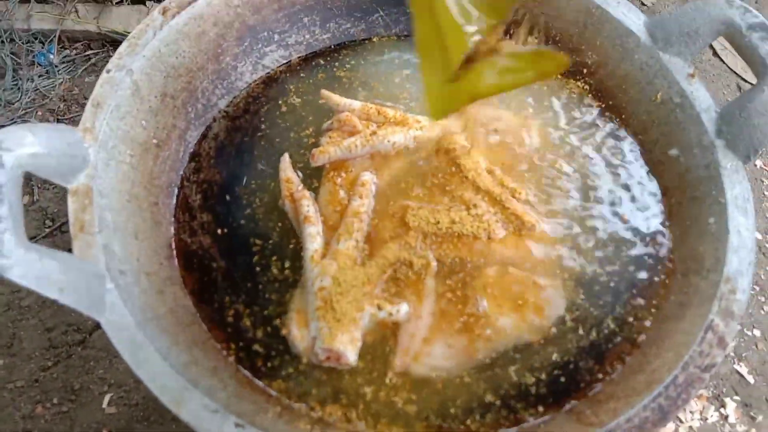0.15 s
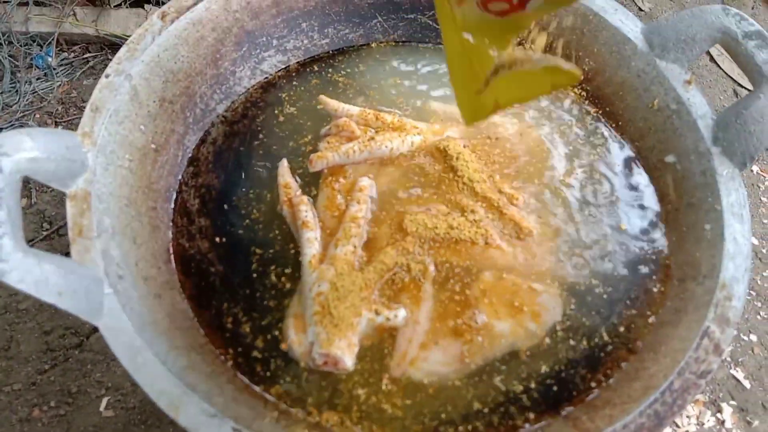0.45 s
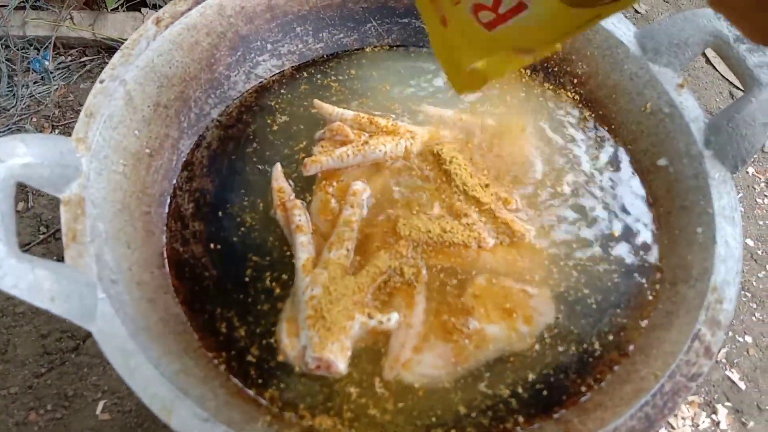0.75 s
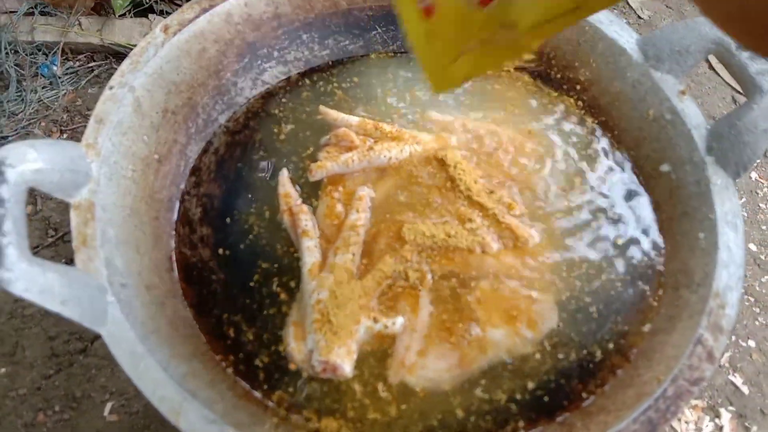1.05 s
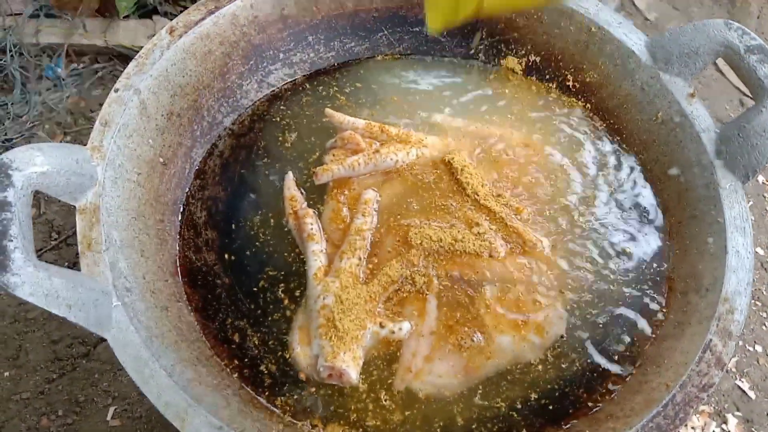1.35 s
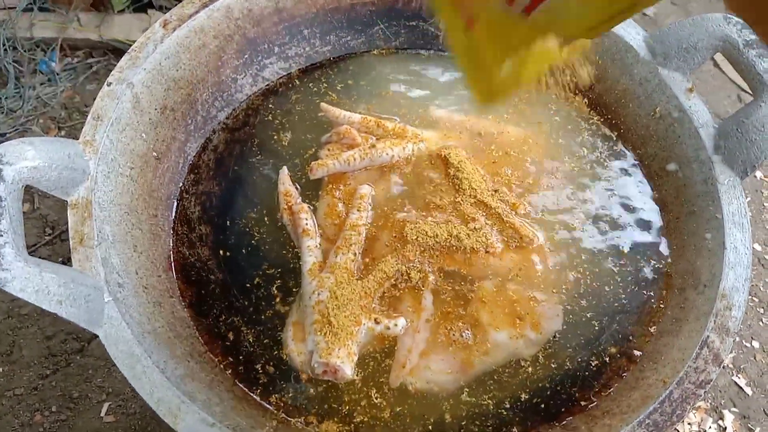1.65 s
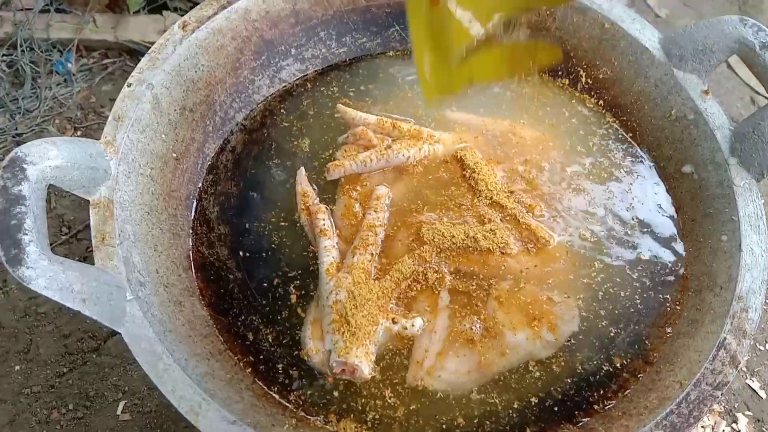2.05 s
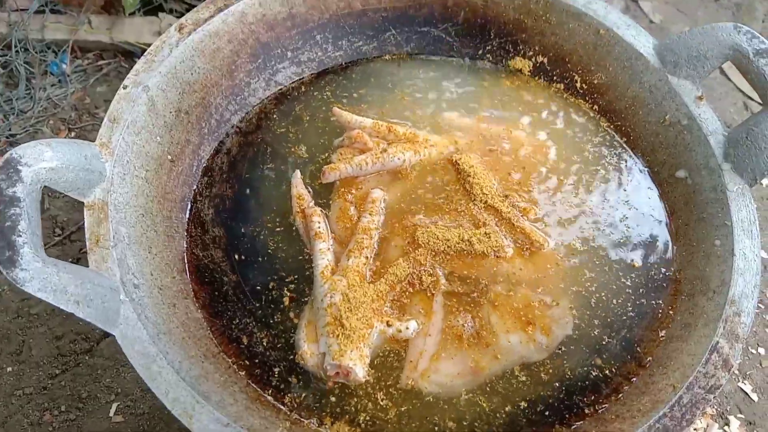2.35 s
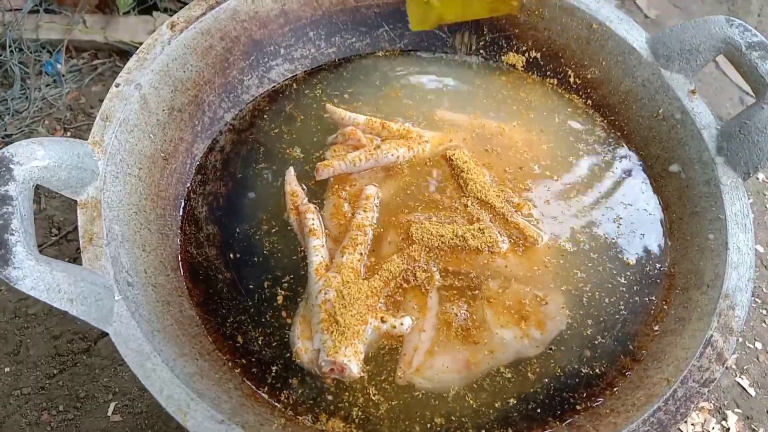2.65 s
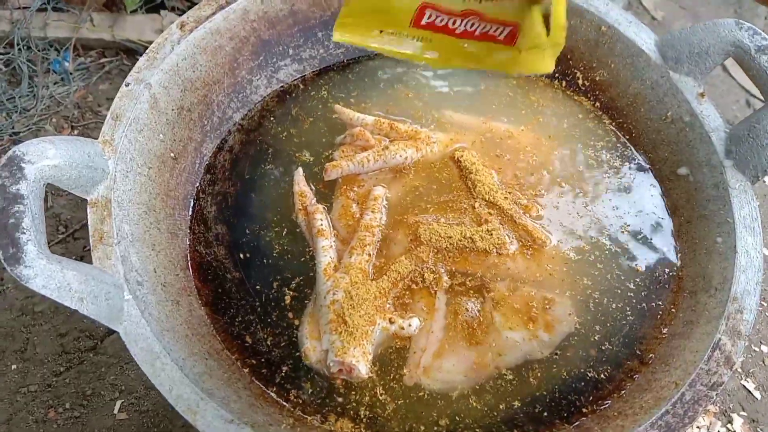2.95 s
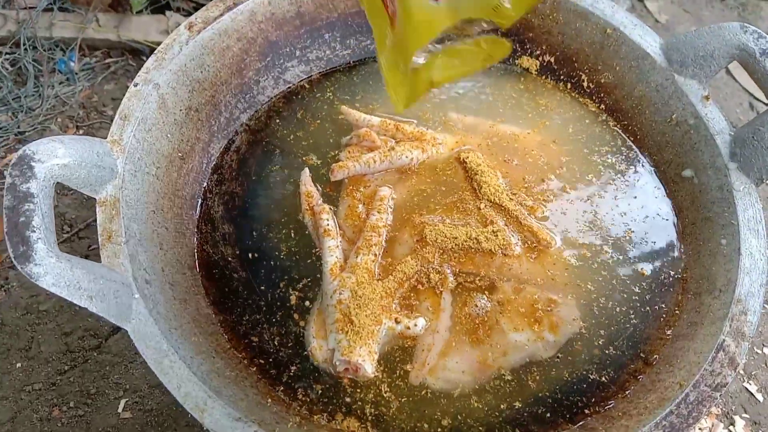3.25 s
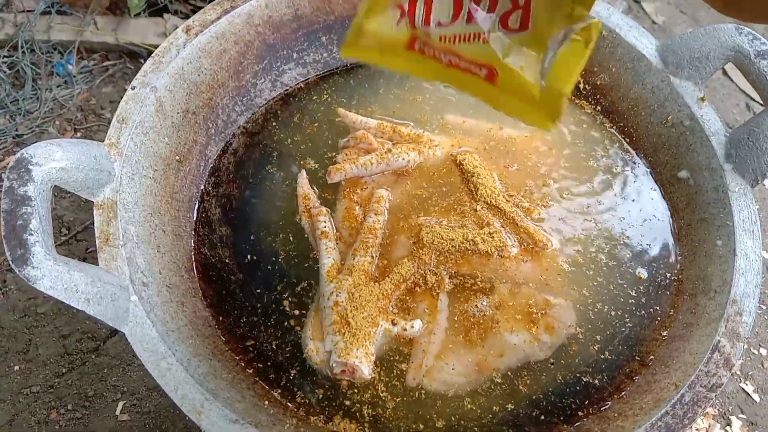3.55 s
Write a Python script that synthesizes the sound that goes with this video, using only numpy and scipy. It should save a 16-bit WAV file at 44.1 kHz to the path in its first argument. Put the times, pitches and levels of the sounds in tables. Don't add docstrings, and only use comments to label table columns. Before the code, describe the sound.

A thin plastic sachet crinkles and snaps sharply, very close, over a pan outdoors.

```python
import sys
import numpy as np
from scipy import signal
from scipy.io import wavfile
from scipy.ndimage import uniform_filter1d, minimum_filter1d

SR = 44100
rng = np.random.default_rng(int(sys.argv[2]) if len(sys.argv) > 2 else 0)


def amplitude_ratio(level_db):
    exponent = np.asarray(level_db, float) / 20
    return 10 ** exponent


def store_wav(level_fs):
    pcm = np.round(np.clip(np.atleast_2d(level_fs), -1, 1) * 32767)
    wavfile.write(sys.argv[1], SR, pcm.T.astype(np.int16))


N = 163170

# pitch_hz, density_db
AIR_COLOUR = [(30, -21), (150, -6.5), (420, -22), (800, -10), (1250, -9), (1800, -10), (4000, -21),
              (5500, -5), (15500, -20)]
# pitch_hz, density_db
FILM_COLOUR = [(210, -44), (350, -53.5), (749, -8), (3960, 0.5), (5710, 4.5), (9330, -24.5), (15500, -5)]
# pitch_hz, width_hz, lift_db
POUCH_RESONANCES = [(3010, 1600, 5.5), (3812, 504, -19.5), (2600, 240, -5), (15500, 710, 4)]
# start_s, level_db, body_db, treble_db
SNAPS = [(0.0528, 0.0, -6, 5), (0.1075, 0.5, 5.5, 8), (0.2458, 1, -9, 5), (0.2753, 8.5, -1, 2.5),
         (0.3122, 0, 1, 9), (0.3205, -1.0, -12, 4), (0.4214, 0.5, -7.5, 0), (0.446, 1.5, 3, 0),
         (0.491, 0, -5, 2.5), (0.5115, 2, -6.5, 0), (0.743, 1.0, -5.5, -6), (0.8335, -2, 1, 5.0),
         (0.979, -1.5, 5.5, 5), (0.9916, 2.5, -0.5, -2), (1.0, -2.5, -4, -2.0), (1.0111, -0.5, 1, 0.0),
         (1.0154, -2, -9.0, -1), (1.0463, 5.5, 1.5, 3), (1.0691, 0.5, -7, -3), (1.2182, 2.5, 0, -2),
         (1.4047, 1.0, -0.5, 9), (1.4982, 4.5, 3.5, 2), (1.5797, -3, 3, -1.0), (1.6041, 0.5, -2, 1.0),
         (1.6104, -6, 5, -4.0), (1.6144, 7, -6.5, -2.0), (1.7036, 6.5, -0.5, 5.5), (1.7396, 2, -8, 0),
         (1.777, -5.5, 0, -4), (1.795, 2, -7, 3), (1.9854, 3.5, -2.5, -3), (2.096, -1.5, -24, -10),
         (2.1434, 0.5, -3, 1), (2.1613, -5, 3, -4), (2.176, -2.5, -3, -1), (2.2831, 3, -1, 5),
         (2.7707, 0, -3, -10), (2.8459, 2.5, -2, 7), (2.8889, -0.5, -9, -2), (2.9147, -13, 0, -3),
         (2.969, -0.5, 0, -1), (3.0838, 9, -10, 0), (3.2808, -7, 9.0, 0.5), (3.2924, 8.5, 2.5, -10),
         (3.3022, 0, 5, -2.0), (3.3079, -1.5, 4, -5.0), (3.325, -0.5, -6, -3), (3.4024, 9, -7, 9),
         (3.4103, 5.5, -3.5, 3), (3.5816, -1.5, 2, -2)]
# start_s, level_db, body_db
SMALL_CREASES = [(0.0406, -5.5, -4), (0.1273, -5.5, -4.5), (0.2003, -2.5, 5.5), (0.2132, -3.5, 6),
                 (0.2199, -5.5, 6), (0.2265, -3.5, 3), (0.2398, 0.5, 5), (0.2908, -6.5, 0),
                 (0.3859, -5, 2.5), (0.4135, -3, 0), (0.461, -2.5, -1), (0.4734, -5, 0), (0.5238, -6.5, 8),
                 (0.5982, -2.5, 0), (0.6017, -6, 5), (0.6195, -9, 3), (0.6301, -7.5, 9), (0.6496, -3, 3),
                 (0.6733, 2, -8), (0.692, -10.5, -2), (0.7004, -17, 12), (0.7123, -3, 2),
                 (0.7606, -15, -11), (0.7659, -7.5, -10), (0.799, -2, 4.5), (0.8378, -7, 2),
                 (0.845, -8, -4.0), (0.8514, -1, 0.0), (0.8798, -5, 5), (0.9126, -8.5, 4),
                 (0.9619, -4.5, -4.5), (1.0597, -8, -3), (1.0944, -9.5, 2), (1.1111, -4.5, 5),
                 (1.1168, -10.5, -9.5), (1.133, -5.5, 0), (1.1815, -5.5, 4.5), (1.1947, -1, 4.5),
                 (1.24, -8.5, 3), (1.2464, -8, 8.5), (1.3838, -7, -1), (1.3977, -7, 1.0), (1.4165, -8.5, 8),
                 (1.461, -3, -5), (1.4692, -5, 4), (1.4779, -10.5, 11), (1.5194, -3.5, -0.5),
                 (1.5855, -4.5, 5), (1.5927, -5, 12), (1.5989, -7, 1.5), (1.6196, -1, -6), (1.6241, 0, 4),
                 (1.6277, -7.5, -9),
                 (1.694, -6.0, 1), (1.7632, -8, -4), (1.7703, -13, 10), (1.783, -10, -5), (1.821, -11, 2.0),
                (1.8296, -3.0, 1), (1.8762, -1.5, 3.5), (1.885, -5, 0), (1.9403, -6, -3),
                (1.9604, -6.5, -11), (2.0243, 0, -3.5), (2.0543, -1.5, -7), (2.0669, -1, 0),
                (2.0779, -18, 20), (2.1039, -5.5, -8.0), (2.1105, -2.0, -9), (2.119, -8, -4.0),
                (2.1506, -21, -7), (2.1679, -9, 12.5), (2.2134, -1.5, -2.5), (2.2284, -5, 4),
                (2.305, -6.5, -17), (2.3113, -8.5, -6), (2.6254, 1.5, -6.5), (2.6769, -12.5, -17),
                (2.7385, -4, 0.5), (2.7998, -2, 0), (2.8134, -5.5, 4.5), (2.8188, -2.5, -1.5),
                (2.8249, -7.5, 6.0), (2.8348, -9.5, 7), (2.8975, -4.5, -9), (2.917, 0.5, -5),
                (2.9331, -18, 7.0), (2.9397, -7.5, 10.5), (2.9485, -20, -8), (3.05, -8.5, -11),
                (3.0541, -3.5, 1.5), (3.0585, -9, -1), (3.0735, 1.5, -6), (3.107, 1.5, -1),
                (3.1343, 1, -3.0), (3.2487, -8.5, 6), (3.2574, -5, 5), (3.2873, -6, 4), (3.319, -6, 5.5),
                (3.3484, -8.5, -8), (3.3622, -4.5, -7), (3.3717, -5.0, 1), (3.381, -9, -5),
                (3.4405, -6, -9), (3.4906, -4, -9), (3.629, -2.5, -2.5)]
# start_s, level_db
FAINT_RUSTLE = [(0.0029, -7), (0.0172, -16.0), (0.0264, -16.0), (0.0717, -17.0), (0.0953, -18),
                (0.1437, -9), (0.1518, -16), (0.1604, -6.5), (0.1777, -10), (0.1827, -8), (0.2572, -11),
                (0.2964, -14), (0.3527, -11.5), (0.366, -11), (0.4057, -6), (0.505, -16), (0.544, -18),
                (0.5492, -13.5), (0.5789, -10), (0.874, -14), (0.9026, -20), (0.9196, -9.5), (1.1575, -6.5),
                (1.1752, -7.5), (1.257, -16), (1.2795, -12.5), (1.3206, -21), (1.327, -18), (1.372, -13.5),
                (1.3899, -9), (1.5327, -11.5), (1.5545, -7), (1.5704, -5.5), (1.6604, -12), (1.6667, -8),
                (1.675, -12), (1.6863, -14), (1.717, -9.5), (1.7289, -12.5), (1.7567, -4), (1.8406, -21),
                (1.8994, -16), (1.9049, -14),
                (1.9152, -14), (1.9314, -10), (1.9523, -8.5), (1.9747, -15), (2.0106, -11.5),
               (2.0307, -11.5), (2.0363, -14), (2.0839, -24), (2.138, -20), (2.3346, -18.5),
               (2.3992, -27.5), (2.4178, -26), (2.4241, -20.5), (2.5711, -25.5), (2.6119, -25),
               (2.642, -10.5), (2.6643, -12.5), (2.7306, -8.5), (2.7954, -9.5), (3.015, -27), (3.023, -22),
               (3.0285, -18.5), (3.1294, -12), (3.1593, -18), (3.181, -21.5), (3.2026, -21),
               (3.2104, -15.5), (3.2193, -12), (3.23, -16.0), (3.2377, -9.5), (3.2625, -6), (3.2681, -4.5),
               (3.4324, -15), (3.4771, -12), (3.5123, -14), (3.5219, -24), (3.5284, -14), (3.54, -17),
               (3.5514, -20), (3.5612, -13.5), (3.577, -11.5), (3.65, -14.5), (3.6637, -16.5)]

AIR_DB, AIR_PATCHY_DB = -55, 5.5
TILT_PER_OCTAVE, MODE_SPREAD_DB, TREBLE_SPREAD_DB = 1.7, 4.5, 6
PATCH_DB, PATCH_OCTAVES = 6.0, 0.46
SWELL_S, BUCKLE_S, CLICK_SHARE, GRIT_DB = 0.0006, 0.0012, 0.49, 3.5
RING_CYCLES, RING_MIN_S, POUCH_LOW_HZ = 19.5, 0.006, 398
SNAP_DB = 10
TICKS_PER_S, TICK_SPREAD_DB, TICK_MAX_DB = 990, 3, 9
TICK_BODY_DB, TICK_BODY_SPREAD_DB, TICK_TREBLE_DB = 4, 1, -4.5
AFTER_S, AFTER_DB, BEFORE_S, BEFORE_DB, SETTLE_S, SETTLE_DB = 0.016, -28, 0.0052, -15, 0.044, -38.5
PAN_DB, PAN_T60_S, PAN_CUT_HZ = -16, 0.034, 7100
PUFF_DB, PUFF_LOW_HZ, PUFF_HIGH_HZ = -24.5, 109, 324
PEAK_LIMIT, TREBLE_CUT_HZ, TREBLE_LEAK_DB = 0.97, 15750, -16


def rms_one(x):
    return x / np.sqrt(np.mean(x ** 2) + 1e-20)


def at_hz(points, hz):
    point_hz, point_db = np.array(points).T
    return np.interp(np.log(hz), np.log(point_hz), point_db)


def fade(x, seconds):
    return signal.lfilter([1], [1, -np.exp(-1 / (seconds * SR))], x + 1e-18)


def drift(rate_hz):
    hold_s = 1 / (80 * np.pi * rate_hz)
    noise = rng.standard_normal(N // 40 + 2000)
    slow = fade(fade(noise, hold_s), hold_s)[1900:]
    return np.interp(np.arange(N) / 40, np.arange(len(slow)), rms_one(slow))


def air():
    out = 0
    edges = 25 * 2 ** np.arange(0, 9.4, 1 / 3)
    white = rng.standard_normal((2, N))
    for k, (low, high) in enumerate(zip(edges, edges[1:])):
        bandpass = signal.butter(2, [low, high], "band", fs=SR, output="sos")
        band = signal.sosfilt(bandpass, white[k % 2])
        level_db = at_hz(AIR_COLOUR, np.sqrt(low * high)) + AIR_PATCHY_DB * drift(6.2)
        out = out + amplitude_ratio(level_db) * band
    return amplitude_ratio(AIR_DB) * rms_one(out)


def mode_strengths(modes, level_db, body_db, treble_db):
    lift = sum(db / (1 + (2 * (modes - mid) / wide) ** 2) for mid, wide, db in POUCH_RESONANCES)
    colour = amplitude_ratio(at_hz(FILM_COLOUR, modes) + lift) * np.sqrt(modes / 3500)
    tilt = TILT_PER_OCTAVE * body_db[:, None] * np.clip(np.log2(3500 / modes), 0, 1)
    tilt = tilt + treble_db[:, None] * (modes > 7500)
    facet_hz = 700 * 2 ** (3.5 * rng.random((len(level_db), 1)))
    tilt = tilt + PATCH_DB * np.exp(-(np.log2(modes / facet_hz) / PATCH_OCTAVES) ** 2)
    spread_db = MODE_SPREAD_DB * np.where(modes > 7500, 0.5, 1)
    share = colour * amplitude_ratio(tilt + spread_db * rng.standard_normal(tilt.shape))
    return share * amplitude_ratio(level_db)[:, None] / np.linalg.norm(share, axis=1, keepdims=True)


def film(onset, level_db, body_db, treble_db):
    modes = np.geomspace(400, 16200, 40)
    share = mode_strengths(modes, level_db, body_db, treble_db)
    grit = amplitude_ratio(GRIT_DB * rng.standard_normal(N))
    slips = rms_one(rng.standard_normal((2, N)) * grit)
    signs = 0.5 + rng.standard_normal(share.shape)
    out = np.zeros(N)
    for k, hz in enumerate(modes):
        hits = np.bincount(onset, share[:, k], N)
        hold_s = BUCKLE_S * (3500 / hz) ** 0.4
        swell_s = SWELL_S * (3500 / hz) ** 0.75
        burst = fade(fade(hits, swell_s), hold_s) / (SR * swell_s * np.sqrt(SR * hold_s))
        click = np.bincount(onset + int(swell_s * SR), share[:, k] * signs[:, k], N)[:N]
        push = CLICK_SHARE * click + burst * slips[k % 2]
        radius = amplitude_ratio(-60 / (max(RING_CYCLES / hz, RING_MIN_S) * SR))
        turn = 2 * np.pi * hz / SR
        ring = signal.lfilter([1, 0, -1], [1, -2 * radius * np.cos(turn), radius * radius], push)
        out += np.sqrt(1 - radius) * ring
    return signal.sosfilt(signal.butter(3, POUCH_LOW_HZ, "high", fs=SR, output="sos"), out)


def sachet():
    rustle = [(s, db, 0) for s, db in FAINT_RUSTLE]
    large = np.transpose(SNAPS)
    small = np.transpose(SMALL_CREASES + rustle)
    start_s, level_db, body_db = np.concatenate([large[:3], small], axis=1)
    creases = np.clip((start_s * SR).astype(int), 0, N - 1)

    kicks = np.bincount(creases, amplitude_ratio(level_db), N)
    strain = amplitude_ratio(AFTER_DB) * fade(kicks, AFTER_S)
    strain = strain + amplitude_ratio(BEFORE_DB) * fade(kicks[::-1], BEFORE_S)[::-1]
    strain = strain + amplitude_ratio(SETTLE_DB) * fade(kicks, SETTLE_S)

    ticks = np.flatnonzero(rng.random(N) < TICKS_PER_S / SR)
    size_db = np.minimum(TICK_SPREAD_DB * rng.exponential(1, len(ticks)), TICK_MAX_DB)
    tick_db = 20 * np.log10(strain[ticks] + 1e-9) + size_db
    tick_body_db = rng.normal(TICK_BODY_DB, TICK_BODY_SPREAD_DB, len(ticks))
    treble_db = rng.normal(TICK_TREBLE_DB, TREBLE_SPREAD_DB, small.shape[1] + len(ticks))
    return film(
        np.concatenate([creases, ticks]),
        np.concatenate([level_db + SNAP_DB, tick_db]),
        np.concatenate([body_db, tick_body_db]),
        np.concatenate([large[3], treble_db]))


def pan(x):
    t = np.arange(SR // 8) / SR
    tail = rng.standard_normal(len(t)) * amplitude_ratio(-60 * t / PAN_T60_S)
    tail = signal.sosfilt(signal.butter(2, PAN_CUT_HZ, fs=SR, output="sos"), tail)
    return amplitude_ratio(PAN_DB) * signal.fftconvolve(x, tail / np.sqrt(np.sum(tail ** 2)))[:N]


def puff(x):
    push = np.tanh(2 * x) * rng.standard_normal(N)
    bandpass = signal.butter(1, [PUFF_LOW_HZ, PUFF_HIGH_HZ], "band", fs=SR, output="sos")
    return amplitude_ratio(PUFF_DB) * signal.sosfilt(bandpass, push)


def scene():
    bag = sachet()
    return (air() + bag + pan(bag) + puff(bag))[None]


def low_pass(x):
    return signal.sosfilt(signal.butter(12, 16640, fs=SR, output="sos"), x)


def record(dry):
    gain = minimum_filter1d(PEAK_LIMIT / np.maximum(np.abs(dry), PEAK_LIMIT), size=131)
    x = dry * uniform_filter1d(gain, size=131)
    lowpass = signal.cheby2(16, 30, TREBLE_CUT_HZ, fs=SR, output="sos")
    cut = signal.sosfiltfilt(lowpass, x)
    loudness = uniform_filter1d(np.abs(x), size=131)
    leak = amplitude_ratio(TREBLE_LEAK_DB) * loudness * (x - cut)
    return low_pass(cut + leak)


dry = scene()
out = record(dry)
store_wav(out)
```